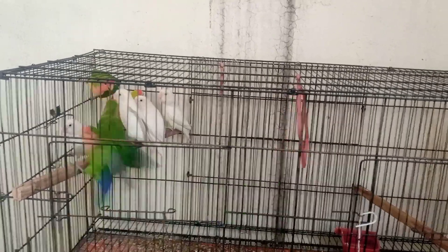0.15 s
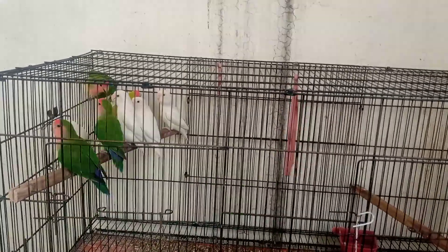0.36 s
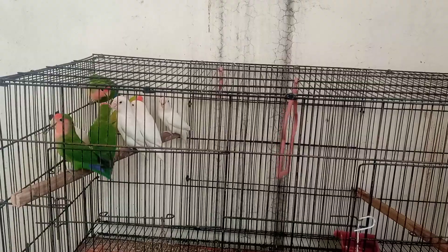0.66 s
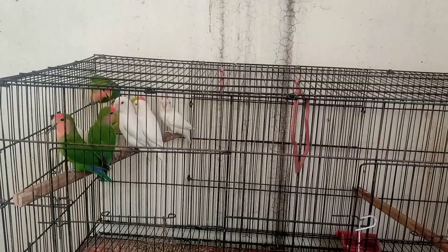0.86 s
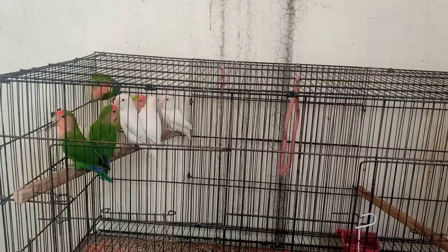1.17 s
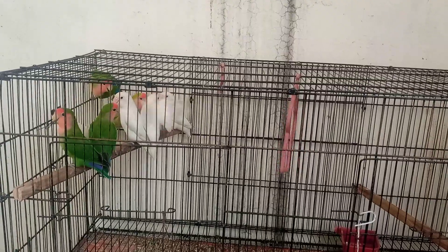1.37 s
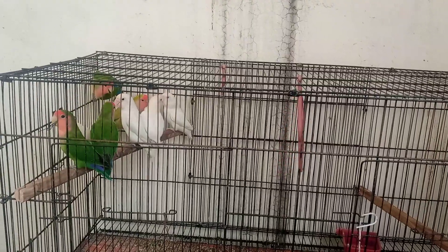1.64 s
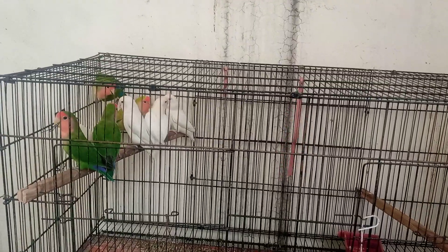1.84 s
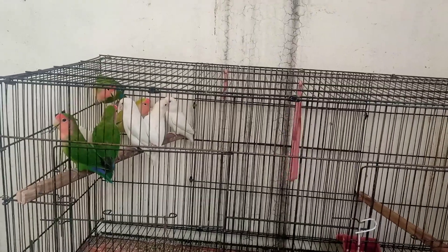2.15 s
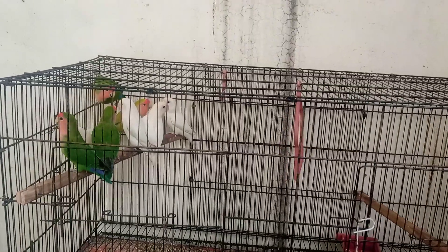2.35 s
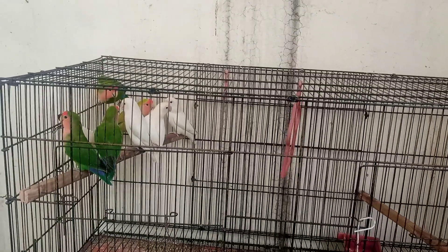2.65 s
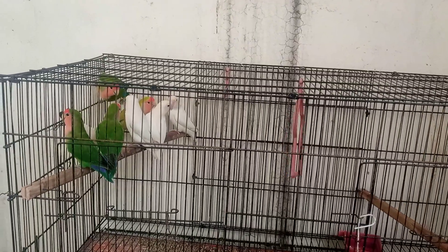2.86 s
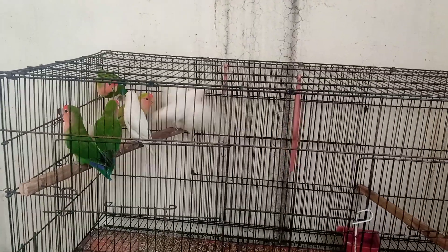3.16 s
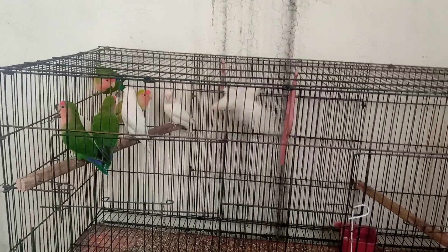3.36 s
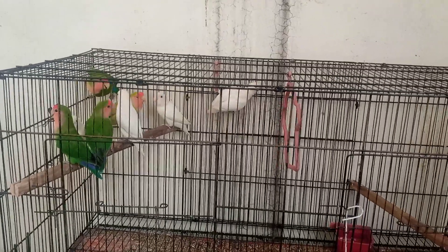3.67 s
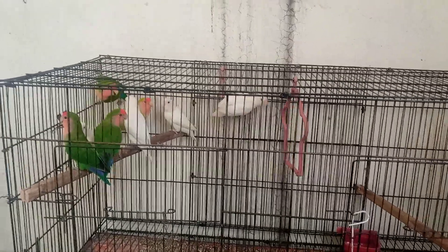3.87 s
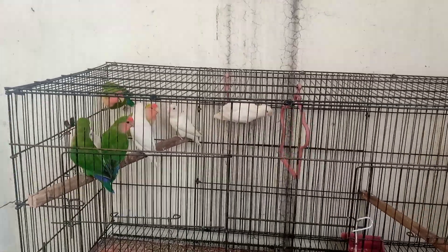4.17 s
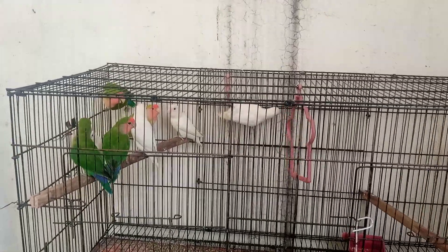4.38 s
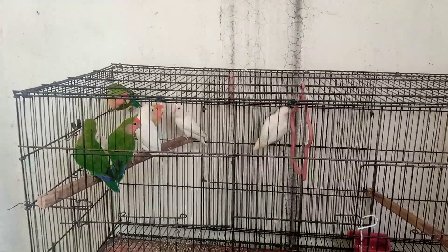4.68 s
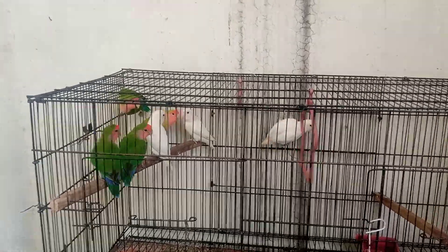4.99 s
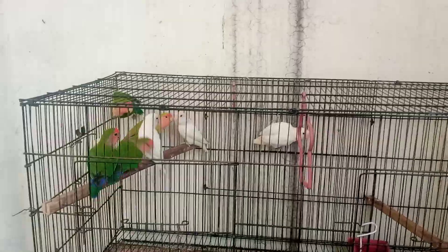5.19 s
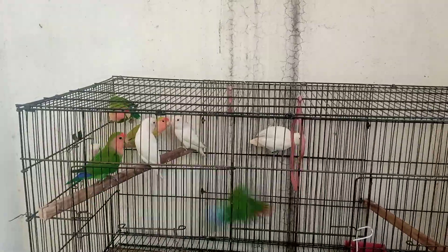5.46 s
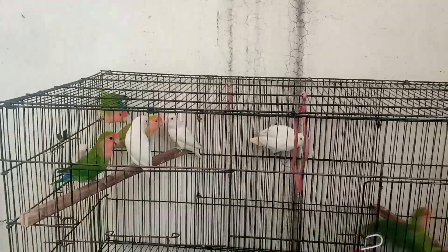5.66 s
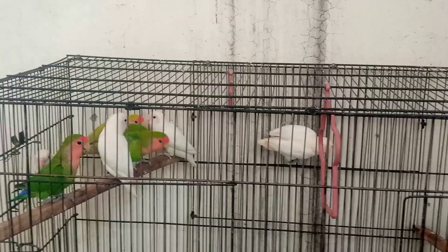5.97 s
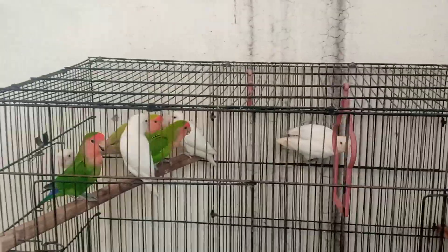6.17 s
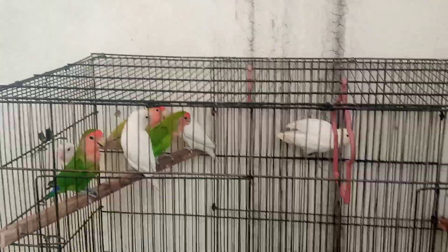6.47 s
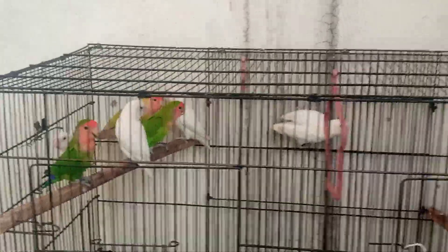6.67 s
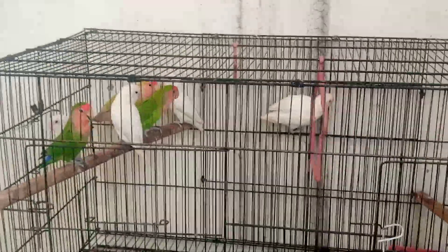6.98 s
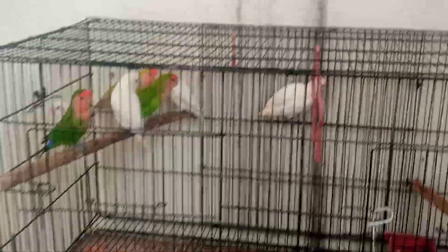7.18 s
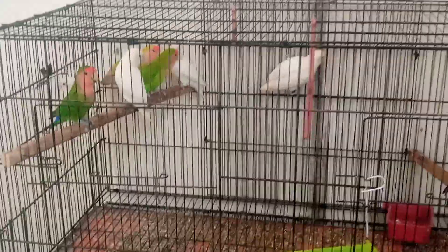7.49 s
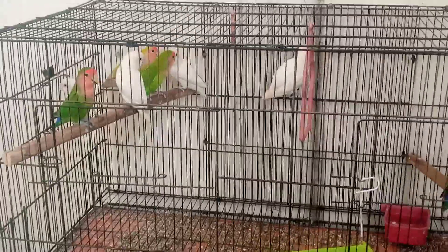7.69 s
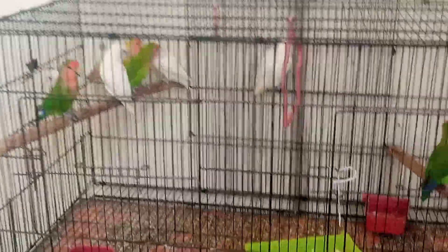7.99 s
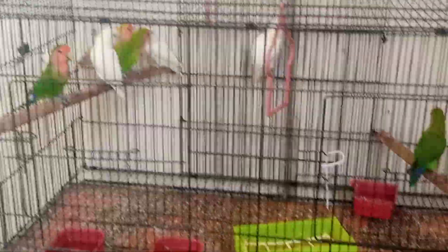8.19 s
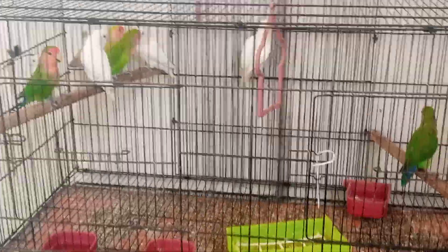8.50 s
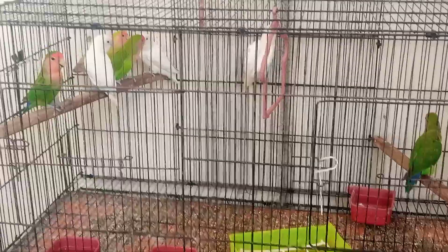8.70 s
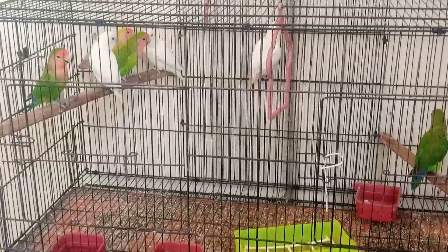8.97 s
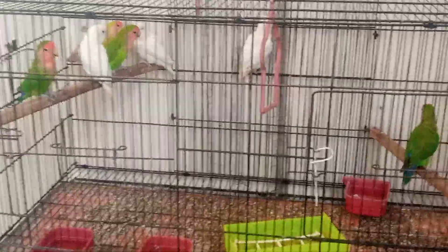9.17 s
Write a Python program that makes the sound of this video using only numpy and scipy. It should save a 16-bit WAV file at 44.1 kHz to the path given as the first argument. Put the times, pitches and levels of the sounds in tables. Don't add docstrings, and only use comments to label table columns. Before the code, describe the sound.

Bright, piercing lovebird calls ring briefly off bare walls. Early chirps and a wing flutter lead to a rasping shriek and rapid whistled chatter; after a quiet gap come hoarse screeches, peeps and a cluster of strong chirps around the middle, then scattered calls. Faint fan hum, distant twittering and tiny cage-wire pings sit beneath, captured by a phone whose level control ducks the room noise.

```python
import sys
import numpy as np
from scipy import signal
from scipy.fft import rfft, irfft, next_fast_len
from scipy.io import wavfile
from scipy.ndimage import uniform_filter1d, minimum_filter1d, map_coordinates

SR = 44100
rng = np.random.default_rng(int(sys.argv[2]) if len(sys.argv) > 2 else 0)


def gain_from_decibels(decibels):
    exponent = np.asarray(decibels, float) / 20
    return 10 ** exponent


def pcm_store(signal):
    levels = np.round(np.clip(np.atleast_2d(signal), -1, 1) * 32767)
    wavfile.write(sys.argv[1], SR, levels.astype(np.int16).T)


N = 411894

# start in seconds, length in seconds, first pitch in Hz, last pitch in Hz, effort in dB.
SCREECHES = [
    (.629, .116, 2230, 2380, -17),
    (3.52, .125, 2386, 2335, -17.5),
    (4.92, .103, 2164, 2558, -15),
    (7.503, .14, 2132, 2274, -15.5),
    (8.068, 0.11, 1968, 2370, -17),
]
RASPS = [
    (3.385, 0.15, 2020, 2420, -18),
    (3.645, 0.047, 2460, 2482, -22),
    (4.883, 0.032, 1876, 2130, -17),
    (8.168, 0.088, 2367, 2427, -15),
]
CLIMBS = [
    (.745, 0.049, 2427, 3220, -22.5),
    (5.02, 0.043, 2520, 2740, -25.5),
    (7.64, .042, 2380, 2730, -23.5),
]
SQUAWKS = [
    (.8, 0.04, 3420, 3524, -17),
    (3.51, 0.096, 3140, 3280, -23.5),
    (3.685, .04, 2903, 3287, -22.5),
    (5.047, 0.057, 3064, 3194, -15.5),
    (7.682, 0.068, 3203, 3207, -18.5),
]
CHIRPS = [
    (.159, .065, 2060, 2200, -20),
    (.415, 0.018, 2170, 2300, -22.5),
    (4.351, .045, 2127, 2345, -18.5),
    (5.783, 0.046, 2390, 2557, -13.5),
    (5.994, 0.05, 2178, 2146, -16),
    (6.268, 0.049, 2646, 2248, -16),
    (9.295, 0.0094, 2090, 2060, -18.5),
]
FALLS = [
    (6.459, 0.07, 2850, 2030, -11),
    (8.433, 0.07, 2422, 1851, -17.5),
    (8.672, .082, 2381, 1910, -17),
]
SLIDES = [
    (.397, 0.017, 1513, 2170, -24),
    (1.221, 0.0061, 3100, 3330, -42.5),
    (1.52, 0.00786, 2150, 3620, -26.5),
    (4.341, 0.014, 2605, 2110, -20.5),
    (4.395, 0.0092, 2360, 2840, -15.5),
    (5.627, 0.0102, 2172, 2505, -12.5),
    (5.965, 0.033, 3156, 2993, -16.5),
    (6.258, 0.012, 3360, 2670, -19.5),
]
WHISTLES = [
    (.224, 0.029, 2675, 2420, -13.5),
    (.438, 0.03, 2620, 2818, -13.5),
    (4.334, 0.0093, 2430, 2600, -24.5),
    (6.048, 0.0561, 2720, 2447, -15),
    (6.336, 0.051, 2357, 2470, -15),
    (6.543, 0.042, 2475, 2550, -14),
]
PEEPS = [
    (.466, 0.021, 3050, 3000, -17.5),
    (4.405, 0.04, 3120, 3187, -11.5),
    (5.808, 0.052, 2910, 3120, -28.5),
    (6.322, 0.02, 2955, 2946, -16),
]
# start in seconds, length in seconds, first pitch in Hz, effort in dB.
CATCHES = [(0.149, 0.011, 1820, -34), (0.622, .006, 2080, -30), (5.589, 0.011, 1640, -32),
           (5.779, 0.0056, 1740, -27), (5.952, 0.014, 1640, -23.5), (6.251, 0.0096, 1894, -24.5),
           (6.453, .007, 1820, -22), (7.495, 0.0062, 1680, -29.5), (8.057, 0.0075, 1650, -28),
           (8.418, 0.013, 1767, -31), (8.663, 0.0081, 1660, -31.5)]
CLEAR = [
    (5.598, .032, 2199, 2237, -17.5),
    (9.228, 0.063, 1960, 1722, -21.5),
]

SCREECH = dict(rattle_hz=108, depth=.86, rasp_db=-9, tilt_db=.8, hoarse=.36, low_db=-4,
               thin_db=-3, swell_db=1.5, attack_s=.004, bend=1.1, scoop=.04)
RASP = dict(rattle_hz=106.1, depth=0.508, rasp_db=-0.5, tilt_db=1.6, hoarse=0.445, low_db=-4,
            thin_db=-0.5, swell_db=7, attack_s=0.0032, bend=0.82, scoop=0.019)
CLIMB = dict(rattle_hz=109.7, depth=0.358, rasp_db=0.5, tilt_db=2.6, hoarse=0.578, low_db=4.4,
             thin_db=-6.5, swell_db=17.5, attack_s=0.0071, bend=1.1, scoop=0.012)
SQUAWK = dict(rattle_hz=109, depth=.3, rasp_db=-6, tilt_db=1.2, hoarse=.95, low_db=3,
              thin_db=4, swell_db=-3, attack_s=.003, bend=.8, scoop=.03)
CHIRP = dict(rattle_hz=116.2, depth=0.356, rasp_db=0.5, tilt_db=1.24, hoarse=0.3, low_db=-1,
             thin_db=-4, swell_db=9, attack_s=0.0017, bend=0.83, scoop=0.023)
FALL = dict(rattle_hz=112.3, depth=0.18, rasp_db=-16, tilt_db=1.3, hoarse=0.41, low_db=-3,
            thin_db=6.5, swell_db=-9.5, attack_s=0.0013, bend=1.1, scoop=0.0082)
SLIDE = dict(rattle_hz=110, depth=.05, rasp_db=-14, tilt_db=.6, hoarse=.28, low_db=-3,
             thin_db=-9, swell_db=5, attack_s=.0012, bend=.9, scoop=.005)
WHISTLE = dict(rattle_hz=107.4, depth=0.38, rasp_db=-18, tilt_db=0, hoarse=0.33, low_db=-33,
               thin_db=-27, swell_db=-7, attack_s=0.0021, bend=0.737, scoop=0.014)
PEEP = dict(rattle_hz=114, depth=.25, rasp_db=-9, tilt_db=-.6, hoarse=.1, low_db=-27,
            thin_db=-4, swell_db=1.5, attack_s=.003, bend=.9, scoop=.01)
CATCH = dict(rattle_hz=111, depth=0.13, rasp_db=-21, tilt_db=0.8, hoarse=0.49, low_db=1.5,
             thin_db=-14, swell_db=20, attack_s=0.00067, bend=2, scoop=0.0087)
SUNG = dict(rattle_hz=115, depth=.12, rasp_db=-12, tilt_db=.9, hoarse=.1, low_db=1.5,
            thin_db=1.5, swell_db=-1.5, attack_s=.012, bend=1.2, scoop=.04)


def shrieks():
    out = np.zeros(N + SR)
    catch_rise = 1.099
    catches = [(s, length, hz, catch_rise * hz, db) for s, length, hz, db in CATCHES]
    kinds = [(SCREECHES, SCREECH), (RASPS, RASP), (CLIMBS, CLIMB), (SQUAWKS, SQUAWK), (CHIRPS, CHIRP),
             (FALLS, FALL), (SLIDES, SLIDE), (WHISTLES, WHISTLE), (PEEPS, PEEP), (catches, CATCH), (CLEAR, SUNG)]
    for rows, manner in kinds:
        for s, *row in rows:
            sound = note(*row, **manner)
            out[round(s * SR):][:len(sound)] += sound
    return out[:N]


def note(length, first_hz, last_hz, effort_db, rattle_hz, depth, rasp_db, tilt_db, hoarse, low_db,
         thin_db, swell_db, attack_s, bend, scoop):
    t = np.arange(0, length, 1 / SR)
    u = t / length
    slide_up = 1 - scoop * np.exp(-t / 0.014)
    pitch = (first_hz + (last_hz - first_hz) * u ** bend) * slide_up

    waver_db, waver_hz = 4, 28
    db = effort_db + swell_db * (u - .5) + waver_db * wobble(waver_hz, len(t))
    low_db = low_db + thin_db * (u - .5) + 0.93 * waver_db * wobble(waver_hz, len(t))

    slow_start = 1 - 0.194 * np.exp(-t / 0.0273)
    beat = np.cumsum(rattle_hz * slow_start * (1 + 0.036 * wobble(58.6, len(t)))) / SR
    which = (beat + .25).astype(int)
    pulse = np.sin(np.pi * ((beat + .25) % 1)) ** 7.3
    pulse = pulse * gain_from_decibels(2.5 * rng.standard_normal(64))[which]
    slip = .03 * rng.standard_normal(64)[which]
    arch = 1 + depth * (slip + 0.043 * np.cos(2 * np.pi * (beat - .25)))
    chop = 1 - depth + 1.74 * depth * pulse

    hollow = 0.31 * np.minimum(low_db - 5.5, 0)
    orders = [low_db] + [tilt_db * k + hollow * (k % 2) for k in range(6)]
    voice = syrinx(pitch * arch, orders, hoarse)
    voice = voice + gain_from_decibels(rasp_db) * hoarse * rasp(len(t), narrow=2.1)
    edges = np.clip(t / attack_s, 0, 1) * np.clip((length - t) / .002, 0, 1)
    return gain_from_decibels(db + 1.5) * edges * chop * voice


# frequency in Hz, strength in dB.
THROAT = [(1200, -14), (2200, -13), (3300, -10), (4300, -3.5), (5200, 1), (6500, -2.5), (7800, -14),
          (9500, -22), (12000, -28), (14000, -31), (15500, -25)]


def syrinx(pitch_hz, order_db, hoarse):
    size = len(pitch_hz)
    jitter = (.06 + .06 * hoarse) * hoarse * wobble(700, size)
    phase = 2 * np.pi * np.cumsum(pitch_hz * (1 + jitter)) / SR
    tone = np.zeros(size)
    for k, db in enumerate(order_db, 1):
        shake = gain_from_decibels(3.3 * hoarse * wobble(500, size))
        strength = gain_from_decibels(db + along(THROAT, k * pitch_hz)) * shake
        audible = k * pitch_hz < SR / 2.6
        tone += strength * audible * np.sin(k * phase + k * k)
    return tone


def rasp(size, narrow):
    m = 2 ** 13
    throat = gain_from_decibels(narrow * along(THROAT, np.fft.rfftfreq(m, 1 / SR)))
    return unit(irfft(rfft(rng.standard_normal(m)) * throat, m))[:size]


# start in seconds, peak level in dB, top pitch in Hz, octave level in dB.
TICKS = [
    (1.282, -9.5, 4600, -25.5),
    (1.3449, -11, 4610, -42),
    (1.405, -9.5, 4850, -31.5),
    (1.4663, -5, 4750, -25.5),
    (1.5268, -3, 4820, -27),
    (1.5924, -1, 4770, -26),
    (1.6594, -2, 4770, -25.5),
]
# start in seconds, peak level in dB, top pitch in Hz, octave level in dB,
# length in seconds.
CHATTER = [
    (1.7306, 0.5, 4860, -26.5, 0.0047),
    (1.7973, -3, 5105, -26, 0.01),
    (1.8743, -3.5, 4750, -28, 0.021),
    (1.9624, -2.5, 4720, -28.5, 0.015),
    (2.045, -4.5, 4780, -28, 0.016),
    (2.1255, -4, 4715, -27.5, 0.016),
    (2.2065, -3.5, 4760, -25, 0.013),
    (2.288, -3, 4450, -26, 0.011),
    (2.373, -3.5, 4690, -25.5, 0.0166),
    (2.465, -3, 4450, -26.5, 0.012),
]


def chatter():
    out = np.zeros(N)
    tick_s = 0.0033
    for s, db, top_hz, octave_db, length in [(*row, tick_s) for row in TICKS] + CHATTER:
        t = np.arange(0, max(length, .002), 1 / SR)
        pitch = top_hz * (1.03 - 0.27 * np.exp(-t / (0.00075 + 0.085 * length)))
        swell = np.sin(np.pi * (t / t[-1]) ** .65) ** .8
        whistle = swell * syrinx(pitch, [0, octave_db + 26, octave_db + 26], 0.15)
        puff_db = -13 - 450 * length
        puff = gain_from_decibels(puff_db - 60 * t / .02) * np.clip(t / .0012, 0, 1) * rasp(len(t), narrow=1.2)
        out[round((s - .0008) * SR):][:len(t)] += gain_from_decibels(db) * (whistle + puff)
    return out


# frequency in Hz, time to fade by 60 dB in seconds.
WALLS = [(1500, 0.61), (3000, 0.56), (5000, 0.52), (8000, 0.49), (15000, 0.34)]


def walls(x):
    hz, t, z = signal.stft(rng.standard_normal(SR), SR, nperseg=256)
    tail = signal.istft(z * gain_from_decibels(-60 * t / along(WALLS, hz)[:, None]), SR, nperseg=256)[1]
    t = np.arange(len(tail)) / SR
    tail = tail * (1 - np.exp(-t / .005))
    tail = tail * (1 + 0.56 * np.exp(-t / 0.074))
    tail = tail * (1 + 0.46 * np.exp(-((t - 0.032) / 0.01) ** 2))
    return signal.fftconvolve(np.pad(x, (130, 0)), tail / np.linalg.norm(tail))[:N]


# start in seconds, length in seconds, level in dB.
WINGS = [
    (.02, 0.1, -45.5),
    (.215, 0.036, -32.5),
    (5.57, 0.027, -47.5),
    (5.73, 0.016, -48),
]
# frequency in Hz, density in dB per Hz.
FEATHERS = [(24, -35), (62, 0), (119, 2), (233, -12), (746, -15.5), (888, -15), (3300, -25), (4910, -18),
            (11700, -54), (15000, -24)]


def wings():
    t = np.arange(N) / SR
    level = bouts(WINGS, attack_s=.05, release_s=0.1)
    beats = gain_from_decibels(2 * np.sin(2 * np.pi * 22 * t) + 1.2 * wobble(48))
    return gain_from_decibels(8) * level * unit(beats * rush(FEATHERS, patchy_db=3.5))


# start in seconds, length in seconds, level in dB.
RUSTLE = [
    (.005, .14, -56.5),
    (3.23, 0.032, -62.5),
    (3.37, .012, -57),
    (5.5, 0.037, -65),
    (5.57, 0.019, -55),
]


def rustle():
    level = bouts(RUSTLE, attack_s=0.02, release_s=0.086)
    hiss = rush([(2500, -32.0), (4500, 2), (8000, -2.0), (15000, -20)], patchy_db=3)
    return level * gain_from_decibels(8.5 + 2.7 * wobble(81)) * hiss


# start in seconds, frequency in Hz, level in dB, time to fade by 60 dB in seconds.
WIRES = [(.89, 1396, -46, 0.85), (.9, 1890, -46, 0.74), (1.241, 1390, -45.5, 1), (1.61, 1751, -41, 0.32),
         (2.25, 1450, -28, 0.084), (2.335, 1500, -20, 0.036), (2.335, 2840, -28, 0.045),
         (2.432, 1520, -17, 0.04), (2.43, 2630, -22, 0.033), (2.52, 974, -43, 0.56),
         (2.52, 1320, -38.5, 0.36), (2.53, 1634, -43.5, 0.5), (4.502, 1242, -45, 0.92),
         (2.62, 6150, -50, 0.54), (6.931, 5840, -48, 0.63), (7.25, 4980, -45, .35)]


def wires():
    out = np.zeros(N)
    t = np.arange(SR // 2) / SR
    for s, hz, db, t60 in WIRES:
        swell = 1 - np.exp(-t / 0.0081)
        out[round(s * SR):][:len(t)] += gain_from_decibels(db - 60 * t / t60) * swell * np.sin(2 * np.pi * hz * t)
    return out


# frequency in Hz, density in dB per Hz.
FAN = [(24, -43), (40, -18.5), (166, -2.5), (246, -2.5), (399, -6), (439, -2.5), (570, -2.5), (844, -8),
       (1720, -9), (2800, -20), (3500, -76), (4550, -48), (7700, -120)]
# frequency in Hz, level in dB.
HUM = [(172.3, -59), (333.8, -61), (398.4, -56.5), (479.1, -71)]
# frequency in Hz, density in dB per Hz.
TWITTER = [(1760, -66), (3000, -16), (3620, -9), (4630, -5), (4900, -2.5), (6220, -4), (9940, -33),
           (11400, -38), (16000, -22)]
# start in seconds, length in seconds, level in dB.
BOUTS = [
    (.01, 0.16, -55),
    (2.62, .2, -61.5),
    (3.25, 0.14, -58.5),
    (4.7, 0.059, -47),
    (6.8, 0.24, -55),
    (7.36, 0.146, -62),
]


def background():
    t = np.arange(N) / SR
    hum = np.zeros(N)
    for hz, db in HUM:
        hum += gain_from_decibels(db + 48.5 + 3.54 * wobble(14)) * np.sin(2 * np.pi * hz * t + 0.64 * wobble(6))
    fan_db = -45.5 - 0.31 * t
    fan = gain_from_decibels(fan_db + 1.2 * wobble(21)) * (rush(FAN, patchy_db=2.5) + hum)
    twitter_level = gain_from_decibels(-60.5) + bouts(BOUTS, attack_s=0.17, release_s=0.13)
    return fan + twitter_level * rush(TWITTER, patchy_db=-3.0)


def bouts(rows, attack_s, release_s, depth_db=24):
    t = np.arange(N) / SR
    gain = np.zeros(N)
    for s, length, db in rows:
        times = [s - attack_s, s, s + length, s + length + release_s]
        levels = [db - depth_db, db, db, db - depth_db]
        gain += gain_from_decibels(np.interp(t, times, levels, left=-120, right=-120))
    return gain


def rush(spectrum, patchy_db):
    z = signal.stft(rng.standard_normal(N + 512), nperseg=512)[2]
    field = uniform_filter1d(rng.standard_normal(z.shape), size=2, axis=0)
    field = uniform_filter1d(field, size=10, axis=1)
    x = signal.istft(z * gain_from_decibels(patchy_db * unit(field)), nperseg=512)[1][:N]
    return unit(filtered(x, lambda hz: gain_from_decibels(along(spectrum, hz))))


def unit(x):
    return x / np.sqrt(np.mean(x ** 2) + 1e-20)


def along(points, hz):
    f, v = np.transpose(points)
    return np.interp(np.log(hz + 1), np.log(f + 1), v)


def wobble(rate, size=N):
    knots = rng.standard_normal(max(int(size * 4000 / SR) + 4, 750))
    return map_coordinates(knots, [np.arange(size) * rate / SR])


def filtered(x, response):
    m = next_fast_len(N + 8192)
    return irfft(rfft(x, m) * response(np.fft.rfftfreq(m, 1 / SR)), m)[:N]


def ducking(birds):
    lag = np.exp(-1 / (0.013 * SR))
    loud_db = 10 * np.log10(signal.lfilter([1 - lag], [1, -lag], birds ** 2) + 1e-12)
    duck_db = -26 / (1 + np.exp(-(loud_db + 14.5) / 3.6))
    slow = np.exp(-1 / (0.0033 * SR))
    return signal.lfilter([1 - slow], [1, -slow], duck_db)


def scene():
    calls = shrieks()
    ticks = filtered(chatter(), lambda hz: 1 / (1 + (3100 / (hz + 1)) ** 12))
    echo = walls(gain_from_decibels(-2) * calls + gain_from_decibels(-8.5) * ticks)
    birds = gain_from_decibels(7.0) * (calls + gain_from_decibels(-7.0) * ticks + echo)
    birds = filtered(birds, lambda hz: 1 / (1 + (1350 / (hz + 1)) ** 12))
    duck_db = ducking(birds)
    room = wings() + rustle() + wires() + background()
    return (gain_from_decibels(0.34 * duck_db) * birds + gain_from_decibels(duck_db) * room)[None]


def low_pass(x):
    return signal.sosfilt(signal.butter(12, 17110, fs=SR, output="sos"), x)


def record(dry):
    need = np.minimum(1, (.52 / (abs(dry[0]) + 1e-9)) ** .75)
    gain = uniform_filter1d(minimum_filter1d(need, size=89), size=88)
    slow = np.exp(-1 / (0.026 * SR))
    gain = gain * np.exp(0.65 * signal.lfilter([1 - slow], [1, -slow], np.log(gain)))
    top_hz = 15850
    mix = filtered(gain * dry[0], lambda hz: (hz < top_hz) + gain_from_decibels(-52))
    return low_pass(mix[None])


dry = scene()
out = record(dry)
pcm_store(out)
```